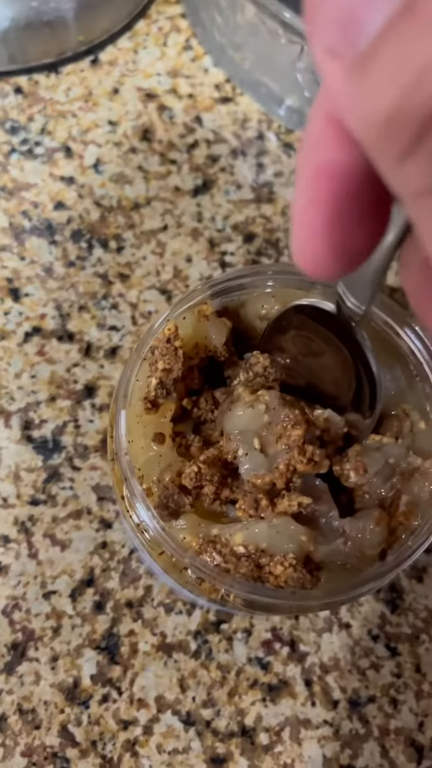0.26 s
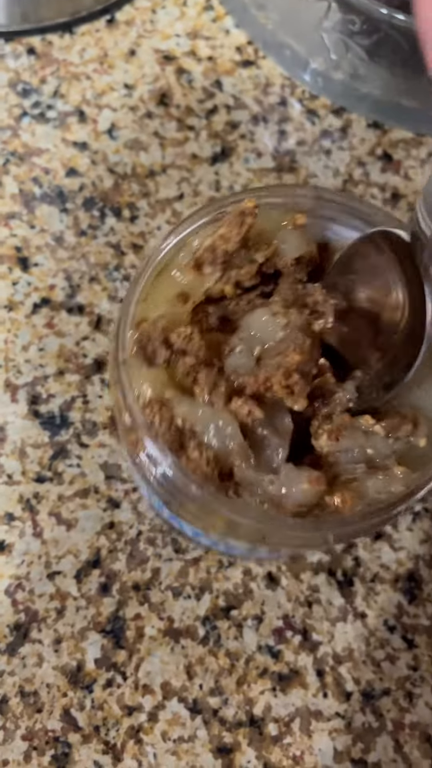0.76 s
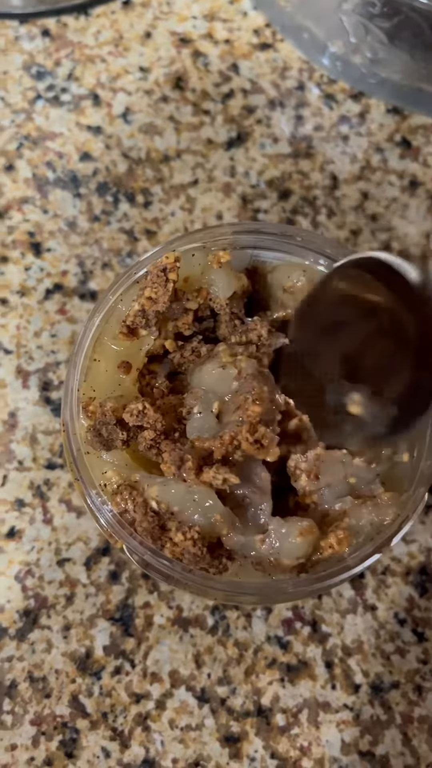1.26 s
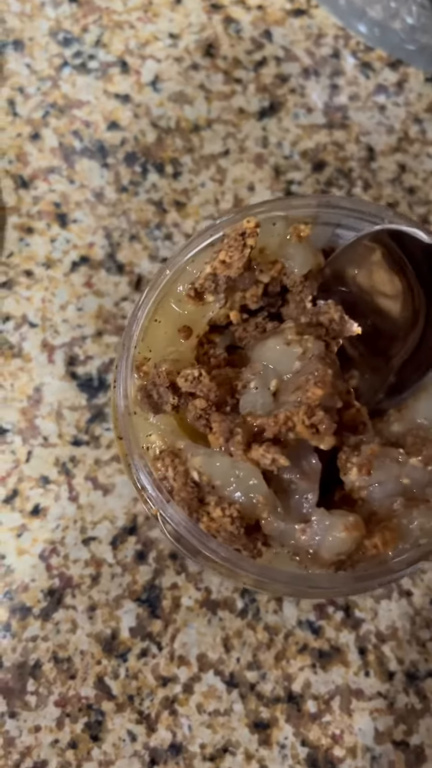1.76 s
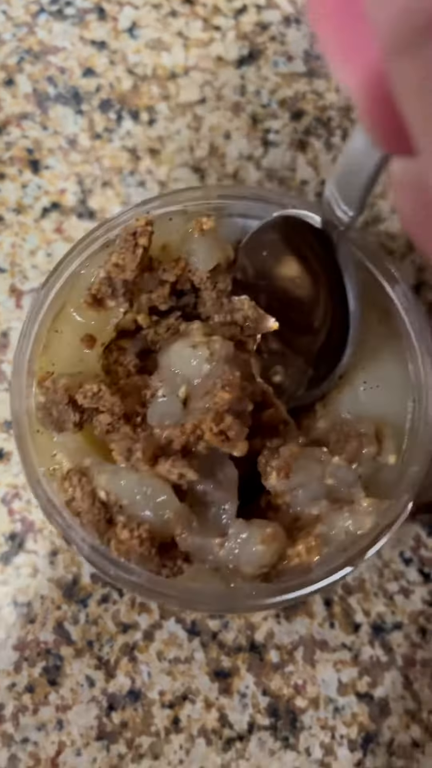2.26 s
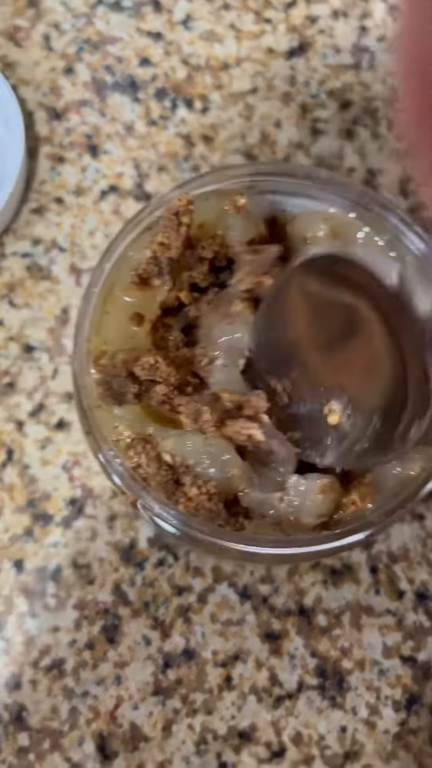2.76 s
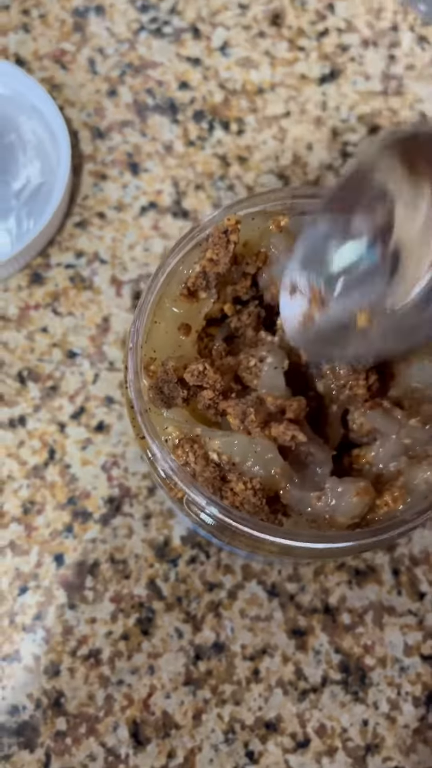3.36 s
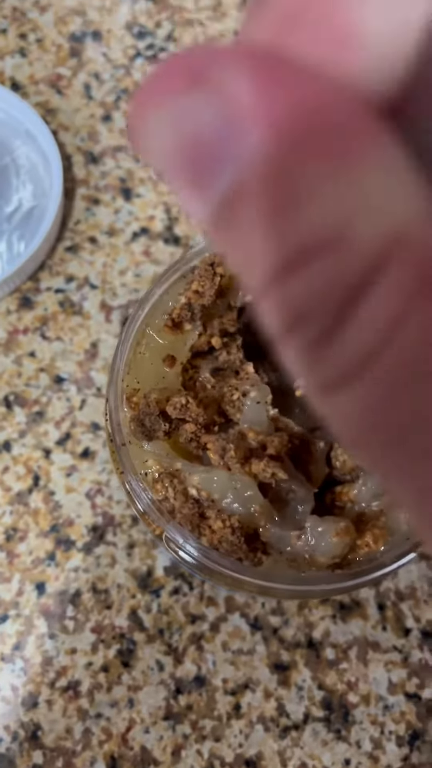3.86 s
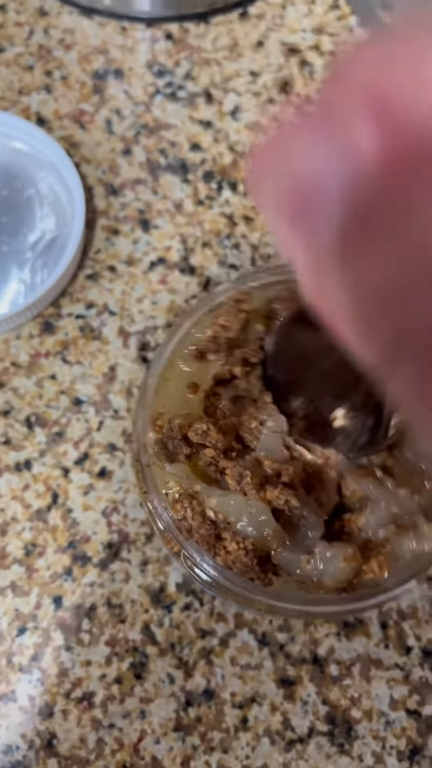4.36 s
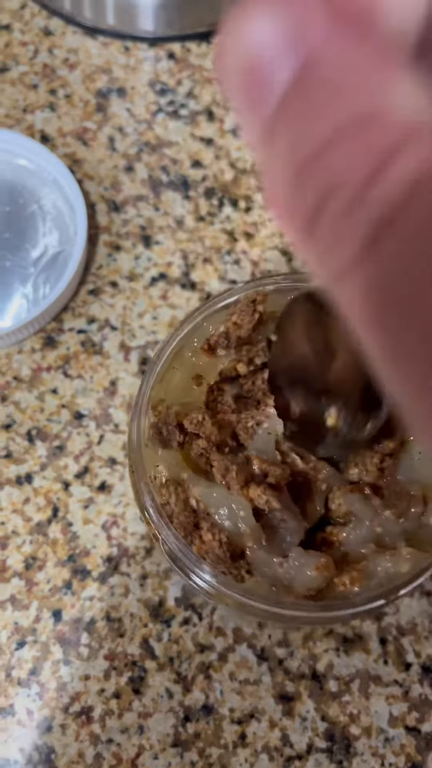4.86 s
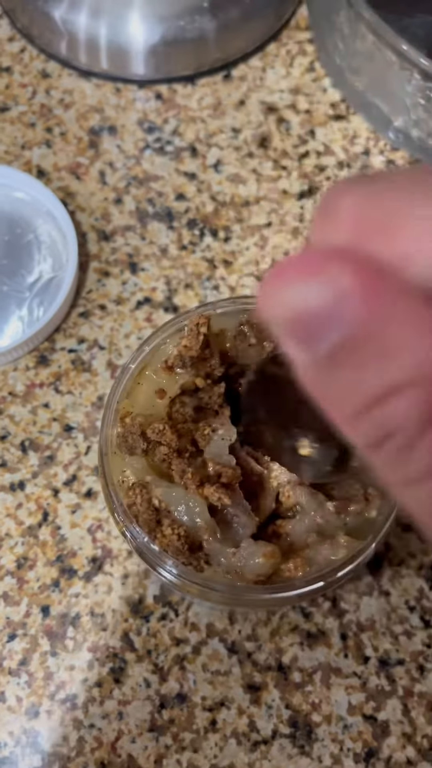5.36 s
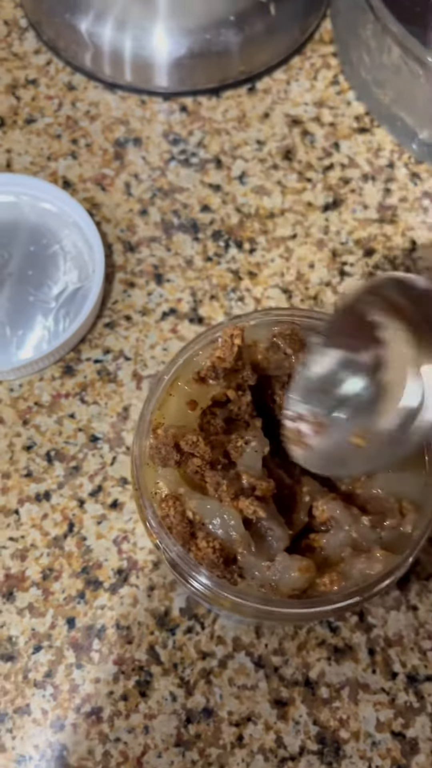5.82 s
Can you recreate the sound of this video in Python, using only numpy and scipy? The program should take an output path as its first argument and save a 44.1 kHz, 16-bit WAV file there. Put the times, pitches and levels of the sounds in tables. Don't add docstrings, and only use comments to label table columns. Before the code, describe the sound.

A small glass jar bumps and scrapes on a stone counter as a metal spoon digs through sticky spread, with small clinks, close up.

```python
import sys
import numpy as np
from scipy import signal
from scipy.fft import rfft, irfft, next_fast_len
from scipy.io import wavfile

SR = 44100
rng = np.random.default_rng(int(sys.argv[2]) if len(sys.argv) > 2 else 0)


def inscribe(sig):
    pcm = np.round(np.clip(np.atleast_2d(sig).T, -1, 1) * 32767)
    wavfile.write(sys.argv[1], SR, pcm.astype(np.int16))


def voltage_ratio(level):
    return 10 ** (np.asarray(level, float) / 20)


N = 268569
TIME = np.arange(N) / SR

# t/s, low swing level/dB, swing f/Hz, time to deepest trough t/s, knock level/dB
HELD_BUMPS = [(0.612, -38.5, 79, 0.033, -48.5), (1.209, -47, 77, 0.028, -62),
              (1.752, -51, 97.5, 0.017, -65), (2.133, -48.5, 96, 0.013, -68),
              (2.181, -20.5, 84, 0.0225, -21.5), (2.724, -39, 77, 0.029, -54),
              (3.23, -56.5, 79.3, 0.032, -75), (3.541, -36, 77.4, 0.025, -59),
              (4.536, -57, 77.6, .027, -63.5), (4.761, -43, 86.7, 0.029, -54),
              (4.889, -47, 105.5, 0.02, -47.5), (6.039, -66, 81, 0.032, -70)]
FREE_BUMPS = [(0.685, -47.5, 84, 0.027, -61.5), (.811, -48, 95, 0.027, -58),
              (1.301, -52.5, 76.4, 0.019, -63), (2.07, -53, 74, 0.034, -66),
              (2.276, -38.5, 81.5, 0.024, -42), (2.401, -53.5, 79.7, 0.028, -74),
              (2.858, -57, 86.3, 0.025, -67), (4.312, -38, 83.9, 0.0118, -44),
              (4.412, -60, 71.8, .037, -66), (5.237, -42, 78.6, 0.026, -55), (5.96, -49, 83, 0.026, -62)]


def rms_one(x):
    return x / np.sqrt(np.mean(x ** 2) + 1e-20)


def in_time(rows):
    s, *columns = np.transpose(rows)
    return [np.interp(TIME, s, column) for column in columns]


def at_hz(points, hz):
    point_hz, value = np.array(points)[:, 0], np.array(points)[:, 1]
    return np.interp(np.log(hz + 1), np.log(point_hz + 1), value)


def colour(x, points):
    log_gain = np.log(voltage_ratio(at_hz(points, np.fft.rfftfreq(8192, 1 / SR))))
    cepstrum = irfft(log_gain)
    cepstrum[1:4096] *= 2
    cepstrum[4097:] = 0
    response = irfft(np.exp(rfft(cepstrum)))
    response /= np.linalg.norm(response)
    return signal.oaconvolve(x, response[None], axes=1)[:, :N]


def drift(rate):
    knots_per_s = 400
    knots = rng.standard_normal(int(N / SR * knots_per_s) + 3)
    r = np.exp(-2 * np.pi * rate / knots_per_s)
    slow = signal.lfilter([1], [1, -2 * r, r * r], knots)
    return np.interp(TIME * knots_per_s, np.arange(len(slow)), rms_one(slow))


def pair(apart_db):
    common, left, right = rng.standard_normal((3, N))
    return common + voltage_ratio(apart_db) * np.array([left, right])


def add(out, s, sound):
    i = round(s * SR)
    out[..., i:i + sound.shape[-1]] += sound[..., :N - i]


def tone(rows, wobble, wobble_db):
    hz, db = in_time(rows)
    cycles = np.cumsum(hz * (1 + wobble * drift(40))) / SR
    return np.sqrt(2) * voltage_ratio(db + wobble_db * drift(2.5)) * np.sin(2 * np.pi * cycles)


def stroke(s, length, db, swell_db, rise=904.5, fall=696):
    arch_db = 3.5
    along = np.clip((TIME - s) / length, 0, 1) - .5
    db = db + swell_db * along - arch_db * (2 * along) ** 2
    return voltage_ratio(db - rise * np.maximum(s - TIME, 0) - fall * np.maximum(TIME - s - length, 0))


def low_swing(t, swing_db, hz, trough, t60):
    sub_db, glide = -10, 1200
    late = t - trough
    grow = np.exp(-(np.minimum(late, 0) / 0.014) ** 2) * np.minimum(t / 0.016, 1)
    fade = voltage_ratio(-60 * np.maximum(late - .011, 0) / t60)
    swing = np.cos(2 * np.pi * (hz * late - glide * np.minimum(late, 0) ** 2))
    swing = swing + voltage_ratio(sub_db) * np.cos(2 * np.pi * .76 * hz * late)
    return -voltage_ratio(swing_db) * grow * fade * swing


def falling_knock(t, knock_db):
    start_hz, end_hz, fall_s, turn = 400, 165, 0.0082, 0.44
    cycles = end_hz * t + (start_hz - end_hz) * fall_s * (1 - np.exp(-t / fall_s))
    window = np.minimum(t / 0.0053, 1) ** 2 * np.exp(-(np.maximum(t - 0.017, 0) / 0.009) ** 2)
    return voltage_ratio(knock_db) * window * np.sin(2 * np.pi * (cycles + turn))


def counter_ring(t, knock_db):
    # f/Hz, level under the knock/dB, t60/s
    counter_modes = [(135, -13.5, 0.082), (296, -14.5, 0.22), (338.5, -10, 0.12), (382, -16, 0.075),
                     (438, -15, 0.067), (556, -8.5, .05), (710, -18, 0.054), (851, -12, 0.04),
                     (1032, 3.5, 0.021), (1200, -19, 0.016)]
    sharp = 0.12
    ring = 0
    for mode_hz, db, t60 in counter_modes:
        softness_db = min(knock_db + 18, 0) * np.log2(mode_hz / 150)
        strike_db = knock_db + 0.44 * rng.standard_normal() + sharp * softness_db
        shape = (1 - np.exp(-t * mode_hz / 0.26)) ** 2 * voltage_ratio(-60 * t / t60)
        phase = 3 * rng.standard_normal()
        ring = ring + voltage_ratio(strike_db + db) * shape * np.sin(2 * np.pi * mode_hz * t + phase)
    return ring


def bumps():
    # f/Hz, level/dB per Hz
    thud_spectrum = [(100, -33.5), (200, -1.5), (400, -5.5), (650, -21.5), (1000, -17.5), (1600, -38.5),
                     (3000, -48)]
    held_t60_s, free_t60_s = 0.11, 0.23
    tail_db, tail_s = -12, 0.2
    out, tail, t = np.zeros(N), np.zeros(N), np.arange(SR // 2) / SR
    rows = [(*row, held_t60_s) for row in HELD_BUMPS] + [(*row, free_t60_s) for row in FREE_BUMPS]
    for s, swing_db, hz, trough, knock_db, t60 in rows:
        sound = low_swing(t, swing_db, hz, trough, t60) + falling_knock(t, knock_db)
        add(out, s, sound + counter_ring(t, knock_db))
        add(tail, s, voltage_ratio(knock_db + tail_db - 60 * t / tail_s) * np.minimum(t / 0.0026, 1))
    return out + colour(tail * pair(apart_db=-9), thud_spectrum)


def slide_levels():
    # start t/s, length t/s, speed as hiss level/dB,
    # weight as rub over hiss level/dB, swell over the stroke/dB
    slide_strokes = [(0, 0.91, -88, 6, 18), (0.621, 0.14, -66, -19.5, 12), (0.782, 0.1, -64, -15.5, -7.5),
                     (1.206, 0.14, -61, -8, -3), (1.363, 0.22, -72, 0, 7.5), (1.558, 0.19, -78, 5, -3.5),
                     (1.772, 0.33, -89.5, 10, 0), (2.185, 0.023, -84.5, 25.5, -15),
                     (2.258, 0.049, -62, -7, -4), (2.317, 0.069, -62.5, -6, 2), (2.43, 0.27, -95, -10, 1),
                     (2.704, 0.041, -57.5, -11, 5), (2.823, 0.22, -68.5, -3, -5.5),
                     (3.198, 0.061, -62, -20.5, -17), (3.547, 0.076, -65.5, -2, -27),
                     (3.632, 0.16, -67.5, 0.5, -0.5), (3.946, 0.056, -69.5, -5, -4),
                     (4.308, 0.11, -66, -1, -16), (4.41, 0.14, -84, 9, -14), (4.689, 0.07, -75.5, -1.5, -3),
                     (4.773, 0.058, -69.5, 1.5, 4.5), (4.84, 0.025, -71, -4, 8),
                     (4.894, 0.097, -62, -0.5, -8.5), (5.23, 0.18, -60.5, -6, -7),
                     (5.432, 0.15, -81, -7, -4), (5.687, 0.065, -89, -4, -6.5),
                     (5.582, 0.091, -69, -5.5, 13), (5.78, 0.021, -81.5, -12.5, 4),
                     (5.832, 0.087, -84, 2.5, 15), (5.952, 0.24, -61, -9.5, 1.5)]
    under_rub_db, under_knock_db, rumble_wait_s, rumble_t60_s = -7, -20.5, 0.016, 0.45
    pushes = np.array([stroke(s, length, db, swell) for s, length, db, weight, swell in slide_strokes])
    hiss = pushes.sum(axis=0)
    rub = voltage_ratio(np.array(slide_strokes)[:, 3]) @ pushes
    rumble = voltage_ratio(under_rub_db) * rub
    for s, *_, knock_db in HELD_BUMPS + FREE_BUMPS:
        rumble += stroke(s + 0.037, rumble_wait_s, knock_db + under_knock_db, 2.9,
                         rise=3100, fall=60 / rumble_t60_s)
    return 20 * np.log10(np.array([hiss, rub, rumble]) + 1e-6)


def patchy(x, edges, patch_db, rate):
    out = 0
    for band in zip(edges, edges[1:]):
        sos = signal.butter(3, band, "band", fs=SR, output="sos")
        out = out + signal.sosfilt(sos, x) * voltage_ratio(patch_db * drift(rate))
    return out


def streaks(hiss_db):
    # f/Hz, level against the hiss/dB
    streak_lines = [(7800, -22.5), (8600, -24), (11900, -19), (12750, -23.5)]
    lines = 0
    for hz, db in streak_lines:
        line = tone([(0, hz, db), (N / SR, hz, db)], wobble=0.0044, wobble_db=0.5)
        lines = lines + line * voltage_ratio(3.7 * drift(20))
    return lines * voltage_ratio(hiss_db)


def base_hiss(rough, hiss_db, rub_db, flutter):
    # f/Hz, level/dB per Hz
    hiss_spectrum = [(2200, -15), (3000, 2), (4100, -6), (5050, 2), (6000, -6), (8500, -5.5), (9700, -5),
                     (10500, -7), (11400, -2), (11800, 1), (12300, -3), (13800, -7), (14200, -20),
                     (15200, -20), (15400, -6), (15750, -6), (15950, -40), (16500, -50)]
    heavy, steep = 0.37, 1.1
    hiss = rms_one(colour(rough, hiss_spectrum))
    lower = patchy(hiss, (2000, 3300, 4400, 6000), patch_db=2.0, rate=48.0)
    lower = lower * voltage_ratio(heavy * np.clip(rub_db - hiss_db - 3.5, -15, 15))
    middle = patchy(hiss, (6000, 8200, 10500, 12400, 14200), patch_db=1.5, rate=21)
    top = signal.sosfilt(signal.butter(8, 14200, "high", fs=SR, output="sos"), hiss)
    top = top * voltage_ratio(steep * np.minimum(hiss_db + 72.5, 0) + 2.4 * drift(10))
    level = voltage_ratio(hiss_db + 2.0 * flutter + 3.6 * drift(90))
    return (lower + middle + top) * level + streaks(hiss_db)


def wall_and_bowl(rough, rub_db):
    # start t/s, length t/s, level/dB, swell/dB
    wall_sings = [
        (2.334, 0.059, -69, 14.5),
        (4.9, 0.077, -78, -2),
        (4.8, 0.056, -79, 6),
        (3.2, 0.16, -75.5, -12.5),
    ]
    # start t/s, length t/s, level/dB, swell/dB
    bowl_rings = [
        (2.33, 0.041, -65, 6),
        (4.325, 0.038, -75, -6),
        (4.893, 0.055, -69.5, 10),
        (4.964, 0.03, -68.5, 1),
        (1.3, 0.026, -75.5, 3),
        (4.81, 0.032, -79, 0),
    ]
    wall = rms_one(colour(rough, [(1500, -39.0), (1900, 22.0), (2300, -33.0), (4500, -28.0),
                                  (5000, -8.5), (5500, -35.0)]))
    wall_gain = voltage_ratio(rub_db - 25.5) + sum(stroke(*row) for row in wall_sings)
    bowl = rms_one(colour(rough, [(4300, -17), (4750, -16), (5000, -2.0), (5350, -12), (5800, -25)]))
    bowl_gain = sum(stroke(*row) for row in bowl_rings)
    return wall * wall_gain * voltage_ratio(2.5 * drift(25)) + bowl * bowl_gain * voltage_ratio(3.4 * drift(50))


def slide():
    # f/Hz, level/dB per Hz
    rub_spectrum = [(470, -44), (800, -52), (1070, -3), (1170, -5), (1560, 4), (1940, 6.5), (2900, -5),
                    (3770, -67), (6380, -120)]
    # f/Hz, level/dB per Hz
    rumble_spectrum = [(90, -17.5), (158, 9.5), (175, 5), (200, 2), (240, -4.5), (310, 0.5), (450, -13.5),
                       (900, -30.5), (1400, -41.5)]
    grit_per_s, grit_db = 700, 2.0
    hiss_db, rub_db, rumble_db = slide_levels()
    flutter = drift(34)
    grit_size = voltage_ratio(grit_db * np.minimum(rng.exponential(1, N), 5) + 5.0)
    grit = (rng.random(N) < grit_per_s / SR) * grit_size
    rough = pair(apart_db=-10) + grit * rng.choice([-1, 1], N)
    rub = patchy(colour(rough, rub_spectrum), (800, 1500, 2300, 3800), patch_db=2.0, rate=16)
    rub = rms_one(rub) * voltage_ratio(rub_db + 1.0 * flutter)
    rumble = rms_one(colour(pair(apart_db=-15), rumble_spectrum)) * voltage_ratio(rumble_db + 6.4 * drift(7.4))
    return base_hiss(rough, hiss_db, rub_db, flutter) + wall_and_bowl(rough, rub_db) + rub + rumble


def squeal():
    # t/s, f/Hz, level/dB
    squeal_curves = [
        [(2.46, 11900, -87), (2.55, 11900, -86), (2.65, 11900, -80), (2.69, 11850, -80), (2.71, 11800, -70),
         (2.74, 11700, -70)],
        [(2.76, 11700, -80), (2.785, 12650, -75), (2.81, 12800, -73), (2.845, 12500, -75), (2.87, 12300, -78)],
        [(2.75, 8650, -86), (2.81, 8600, -85), (2.87, 8500, -86)],
        [(2.93, 12900, -79), (2.96, 12600, -77), (2.98, 11950, -76)],
        [(.85, 11900, -80), (.93, 11900, -87)],
        [(1.19, 11800, -78), (1.225, 11900, -76)],
        [(4.94, 11900, -76), (4.97, 11900, -72), (5.005, 11900, -80)],
        [(2.668, 7750, -80), (2.69, 7800, -78)],
        [(4.865, 7900, -80), (4.885, 7800, -74)],
        [(2.9, 12400, -78), (2.93, 12200, -79)],
        [(5.88, 12000, -84), (5.98, 11850, -78)],
    ]
    out = 0
    for rows in squeal_curves:
        inside = np.clip(np.minimum(TIME - rows[0][0], rows[-1][0] - TIME) / 0.0037, 0, 1)
        out = out + inside * voltage_ratio(3 * drift(70) - 2) * tone(rows, wobble=.003, wobble_db=3.5)
    return out


def shaken(points, **push):
    return rms_one(colour(pair(-17.0), points)) * stroke(**push) * voltage_ratio(0.5 * drift(36))


def low_shudders():
    # f/Hz, level/dB per Hz in each
    scuff_spectrum = [(100, -19), (180, -2.5), (300, -0.5), (430, -8), (600, -18), (1200, -25)]
    judder_spectrum = [(110, -24.5), (155, 4.5), (170, -13.5), (186, -1), (230, -36), (360, -15.5),
                       (440, -24.5), (550, -27.5), (830, -30.5), (1250, -28.5), (2200, -57)]
    groan_spectrum = [(250, -24.5), (400, 9), (480, 11), (570, 3), (800, -38.5)]
    scuff = shaken(scuff_spectrum, s=2.757, length=0.2, db=-65.5, swell_db=3.5, rise=198.5, fall=143.5)
    judder = shaken(judder_spectrum, s=3.82, length=0.0628, db=-52.5, swell_db=1.5, rise=597, fall=121.5)
    groan = shaken(groan_spectrum, s=5.9, length=11, db=-72, swell_db=-1, rise=129.5, fall=100)
    return scuff + judder + groan


def ticks():
    # t/s, snap peak level/dB, brightness as top over lower part/dB
    spread_snaps = [(.087, -64, 5), (.106, -51, 4.5), (0.168, -51, 2), (.1875, -68, 2), (0.1942, -52.5, 1),
                    (0.2158, -54.5, 5), (.2925, -63, 0), (0.4627, -49.5, -5), (0.4922, -47, 2),
                    (.513, -55, 10), (.7355, -55, 3), (0.741, -53, -3), (.7975, -67, 6), (.839, -58, 14),
                    (1.2186, -47.5, 10), (1.272, -49.5, 11), (1.3185, -55, 9), (1.5168, -40.5, -5.5),
                    (1.588, -68, 0), (1.632, -73, -11), (1.8838, -73, -3), (2.409, -62, -1),
                    (2.421, -61, 2), (2.456, -66, 18), (2.6932, -53, 6), (2.7367, -41.5, 3.5),
                    (2.744, -53, 9), (2.8988, -55, -1), (3.0097, -54, 8), (3.0460, -59, 11.5),
                    (3.0721, -65, 1), (3.181, -68, -5), (3.188, -62, 3), (3.1906, -52, -2),
                    (3.196, -61, -14), (3.2135, -65, 2), (3.269, -65, 8), (3.6228, -62, 7),
                    (4.3656, -51.5, 4), (4.4156, -50, -7), (4.4198, -48, -6), (4.6804, -56.5, -3.5),
                    (4.7977, -53, 12), (4.801, -61, 6), (4.8125, -62, 8), (4.8293, -53, 10),
                    (4.8296, -35.5, -10.5), (4.89, -43, -16.5), (5.5167, -73, 3), (5.535, -64, 5),
                    (5.559, -71, -9), (5.6031, -64.5, 0), (5.6181, -56, 2), (5.6257, -52, 0),
                    (5.9476, -59, 9), (5.9936, -50, 6)]
    # t/s, spoon peak level/dB, snap share/dB
    rim_clinks = [(0.514, -55, -15), (1.569, -60, 12), (1.7643, -58, -5), (2.3926, -52.5, -18),
                  (2.888, -51.5, 3), (3.1995, -52, 4), (3.2035, -41.5, 10.5), (3.2298, -50.5, -9),
                  (3.238, -56, -16), (3.28, -54, -1.5), (3.8897, -71, 2), (4.0144, -40.5, 0.5),
                  (4.811, -65, 5), (5.3561, -51.5, -8), (5.4642, -76.5, 7.5), (5.665, -51, -1)]
    # t/s, jar body peak level/dB, snap share/dB
    wall_knocks = [(0.0795, -61.5, -24), (0.524, -55, 2), (0.5268, -43, 1.5), (0.568, -52.5, -6),
                   (0.6104, -55.5, -22), (0.6911, -61.5, 7), (1.198, -59.5, 5), (1.2085, -60, 7),
                   (1.5399, -40, -38), (2.1806, -29.5, -21), (2.185, -36.5, 2), (2.2765, -44.5, -9),
                   (2.2904, -55, -8), (2.391, -48.5, -12), (3.5352, -51.5, -5), (3.5397, -51.5, 2),
                   (4.0146, -47.5, -12), (4.2935, -42, -6), (4.3095, -47, -13), (4.8856, -35, -3),
                   (4.918, -49, -16), (5.268, -49, -19), (5.6046, -65, 1)]
    snap_spoon_db, snap_body_db, clink_body_db, knock_spoon_db = -21.5, -19, -28.5, -5
    rim_bright_db, knock_bright_db = -2, -2
    tail_s = 0.23
    shapes, first, t = np.zeros((4, N)), np.zeros(N), np.arange(SR // 8) / SR
    t60 = np.array([[.005], [.0045], [.008], [.011]])
    tail_db = np.array([[-33], [-40], [-29], [-27]])
    shape = np.minimum(t / 0.000067, 1) * (voltage_ratio(-60 * t / t60) + voltage_ratio(tail_db - 60 * t / tail_s))
    # t/s, snap/dB, brightness/dB, spoon/dB, body/dB
    rows = [(s, db, bright_db, db + snap_spoon_db, db + snap_body_db) for s, db, bright_db in spread_snaps]
    rows += [(s, db + snap_db, rim_bright_db, db, db + clink_body_db) for s, db, snap_db in rim_clinks]
    rows += [(s, db + snap_db, knock_bright_db, db + knock_spoon_db, db) for s, db, snap_db in wall_knocks]
    for s, snap_db, bright_db, spoon_db, body_db in rows:
        peaks_db = np.array([snap_db - bright_db / 2, snap_db + bright_db / 2, spoon_db, body_db])
        add(shapes, s, voltage_ratio(peaks_db[:, None] + 1.5) * shape)
        first[round(s * SR)] += voltage_ratio(body_db + 12.5)
    noise = np.tanh(2 * pair(apart_db=-10))
    lower = colour(shapes[0] * noise, [(5800, -24.5), (7700, 5.5), (8500, -2.5), (10200, 5), (12000, -27.5)])
    top = colour(shapes[1] * noise, [(8500, -37), (10500, 2), (12500, 6.5), (15700, -2.5), (16300, -31)])
    spoon = colour(shapes[2] * noise, [(2200, -31.5), (3000, -8.0), (4100, -6.5), (5000, 2.5),
                                       (6000, 0.0), (7500, -39.0)])
    body = colour(voltage_ratio(-4.5) * shapes[3] * noise + first,
                  [(300, -31.5), (1000, -13), (1550, 3.0), (2000, 0.5), (2700, -5), (3500, -5), (4800, -29.5)])
    return lower + top + spoon + body


def background():
    # f/Hz, level/dB per Hz
    room_spectrum = [(18, -35), (30, -6), (100, -2), (212, -19), (900, -30), (1380, -27), (1660, -17.5),
                     (2550, -25), (2750, -34), (5000, -37), (8000, -42), (12500, -39), (13500, -56),
                     (16500, -75)]
    # f/Hz, level/dB
    room_apart = [(60, -21.5), (300, -1), (600, -6), (1000, 2.5), (1700, -7), (2800, -11), (8000, -6),
                  (16000, -15)]
    # t/s, level/dB
    tremor_curve = [(0.0, -73), (0.39, -80), (0.68, -69.5), (1.52, -74), (1.97, -72), (2.24, -65),
                    (2.37, -74), (2.58, -79), (2.8, -69.5), (3.27, -77), (3.44, -71.5), (4.34, -75.5),
                    (4.49, -71.5), (5.63, -78), (5.78, -83), (6.09, -77)]
    # t/s, f/Hz, level/dB
    engine_curve = [(0, 104, -75), (.8, 103.8, -69.5), (1.3, 107.6, -68.5), (2.1, 112.7, -68),
                    (2.5, 116.4, -75), (2.9, 120.9, -69.5), (3.15, 125, -66.5), (3.3, 111.8, -67.5),
                    (3.5, 101.7, -72.5), (4.2, 95.8, -72.5), (4.6, 99.1, -77.5), (6.09, 95, -89.5)]
    room_db = -73
    common, own = rng.standard_normal((1, N)), rng.standard_normal((2, N))
    air = voltage_ratio(room_db) * rms_one(colour(common + colour(own, room_apart), room_spectrum))
    lumps = colour(pair(-29), [(22, -35.0), (45, 8.0), (85, -3.0), (130, -6.5), (300, -55.0)])
    tremor = rms_one(lumps) * voltage_ratio(in_time(tremor_curve)[0] + 5.5 + 2.5 * drift(17))
    return air + tremor + tone(engine_curve, wobble=0.0049, wobble_db=1.0)


def scene():
    return bumps() + slide() + squeal() + low_shudders() + ticks() + background()


def roll_off(x):
    return signal.sosfilt(signal.butter(12, 16670, fs=SR, output="sos"), x)


def record(dry):
    # f/Hz, phase by which left leads/rad; the ports' sum cancels at odd multiples of pi
    port_phase = [(50, -.12), (200, -.38), (520, -1.15), (900, -.27), (1700, .05), (2800, 2.4), (4200, 1.3),
                  (5200, 1.7), (6120, 3.14), (8200, 6.28), (10350, 9.42), (12500, 12.57), (14750, 15.7),
                  (16500, 18.5)]
    # f/Hz, left minus right level/dB
    port_balance = [(60, -.8), (200, -2), (350, -3.5), (800, -6), (1050, -4.5), (1400, -1.5), (2200, 0),
                    (2900, -6), (4600, -5), (5800, -.5), (15000, -.5)]
    mic_low_hz, mic_top_hz = 42, 16350
    size = next_fast_len(N + 4096)
    hz = np.fft.rfftfreq(size, 1 / SR)
    half = np.exp(.5j * at_hz(port_phase, hz)) * voltage_ratio(at_hz(port_balance, hz) / 2)
    low_end = hz ** 2 / np.sqrt(hz ** 4 + mic_low_hz ** 4)
    top_end = 1 / np.sqrt(1 + (hz / mic_top_hz) ** 200)
    ports = irfft(rfft(dry, size) * low_end * top_end * np.array([half, 1 / half]), size)[:, :N]
    return roll_off(ports)


dry = scene()
out = record(dry)
inscribe(out)
```